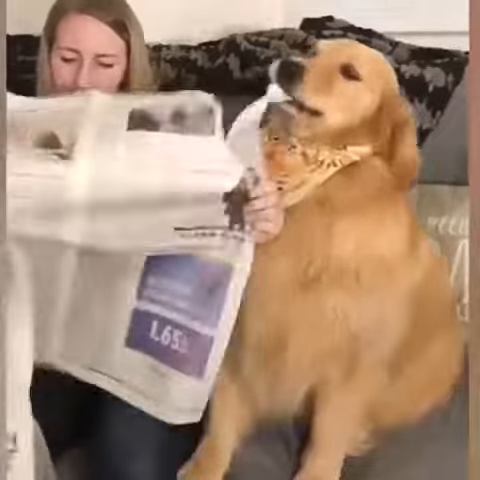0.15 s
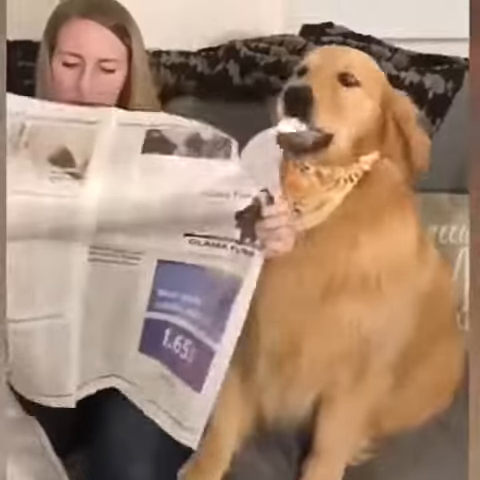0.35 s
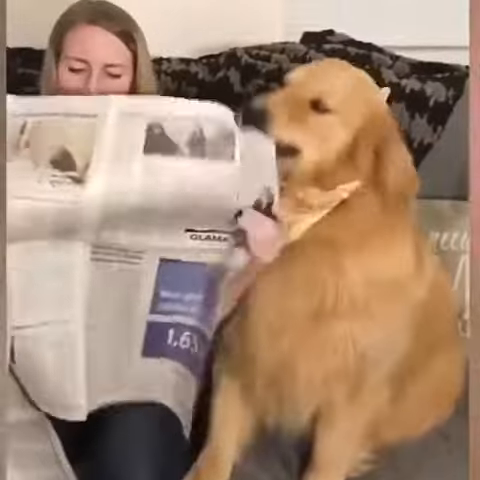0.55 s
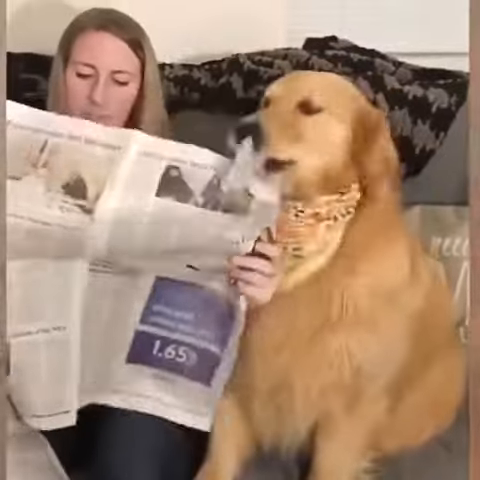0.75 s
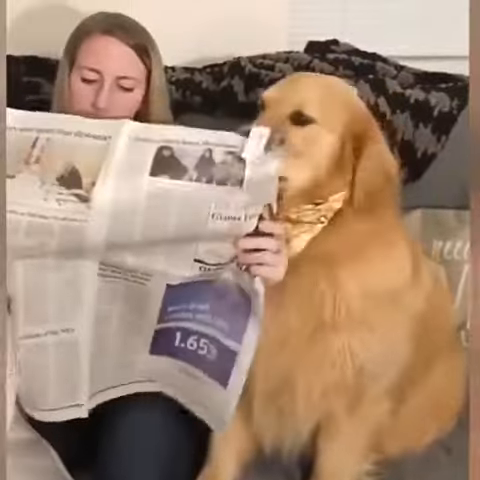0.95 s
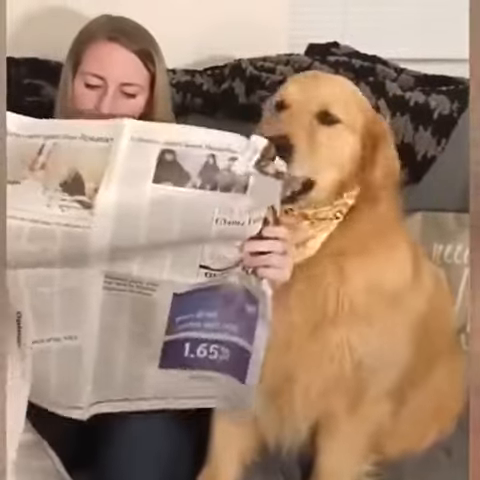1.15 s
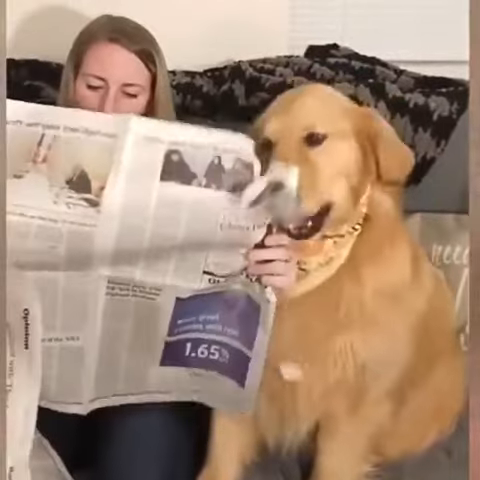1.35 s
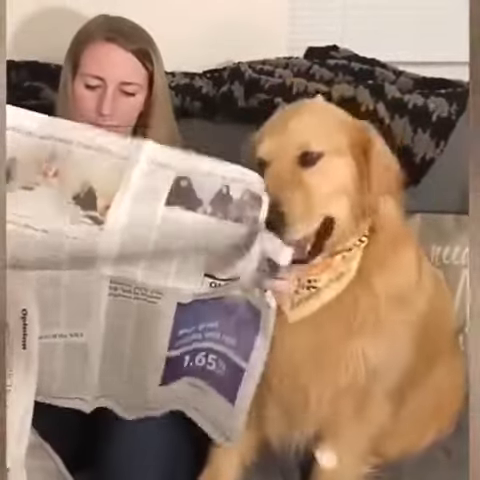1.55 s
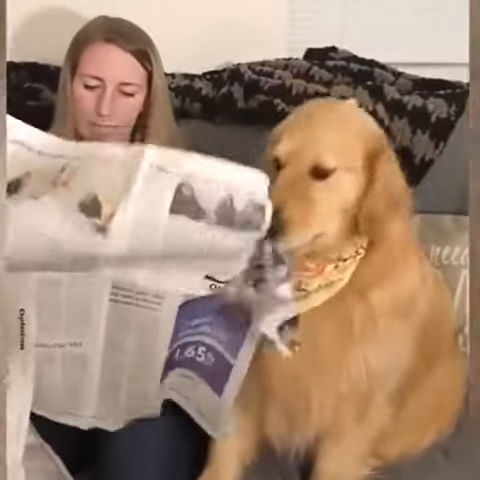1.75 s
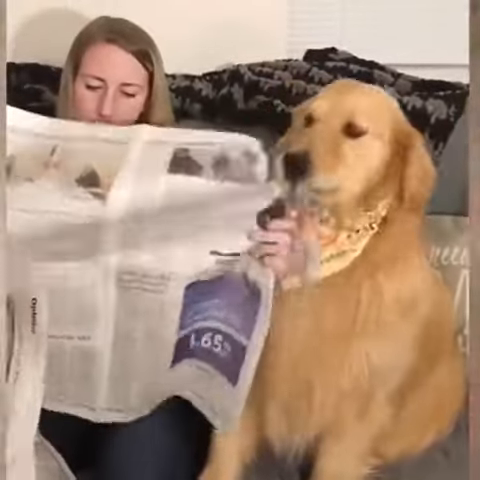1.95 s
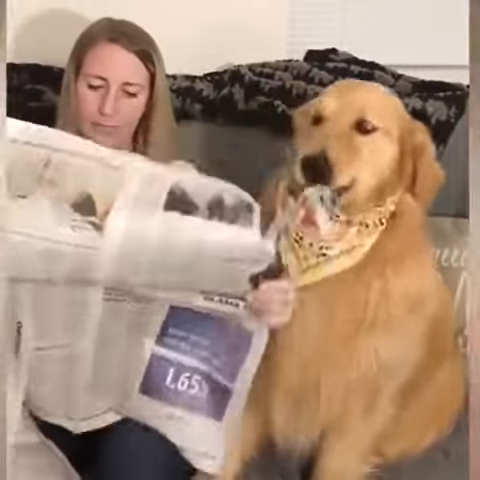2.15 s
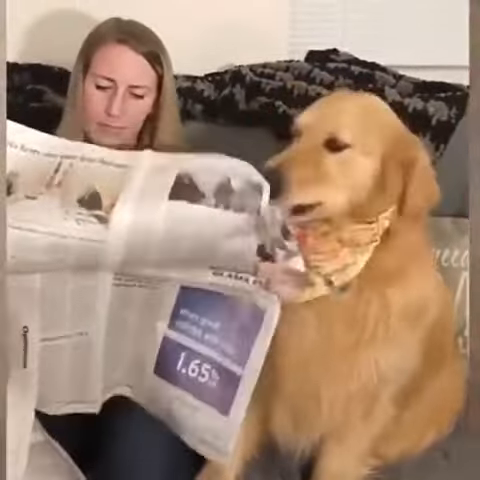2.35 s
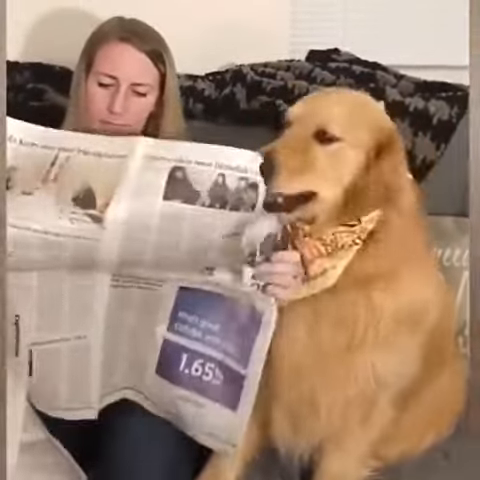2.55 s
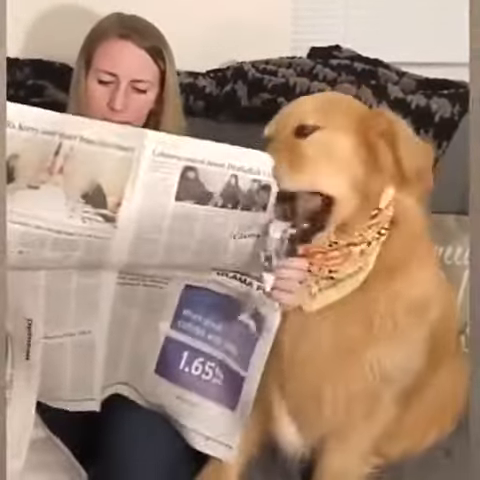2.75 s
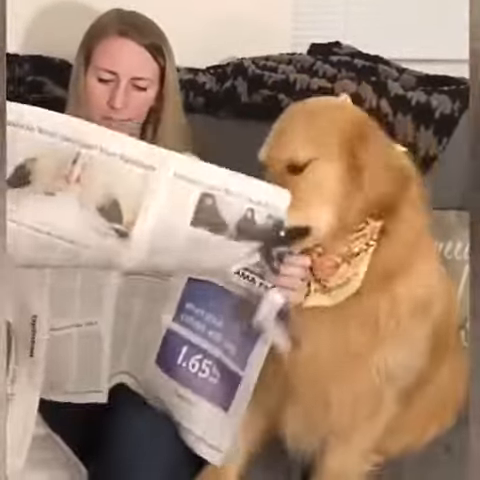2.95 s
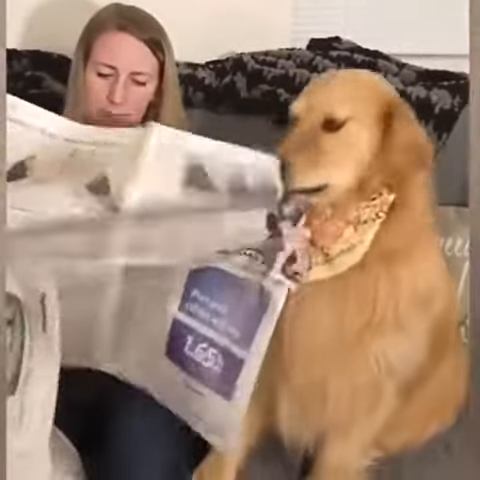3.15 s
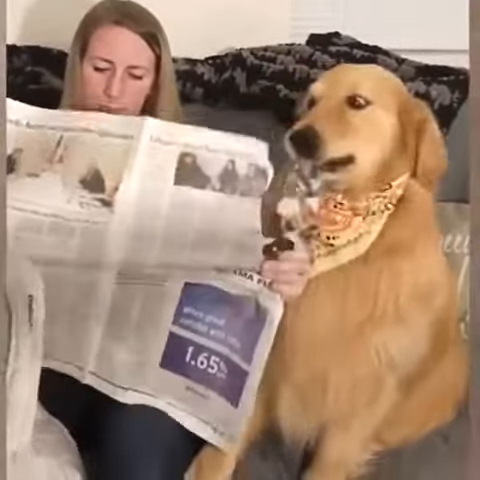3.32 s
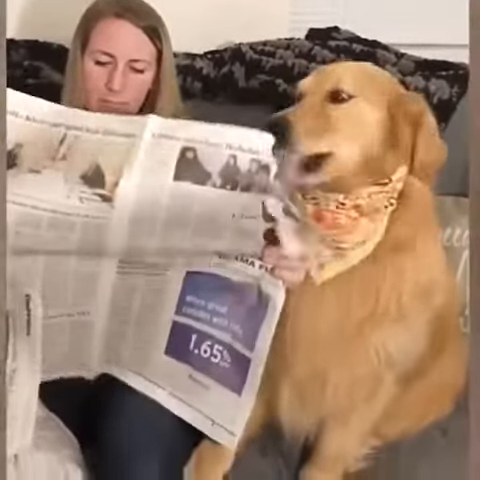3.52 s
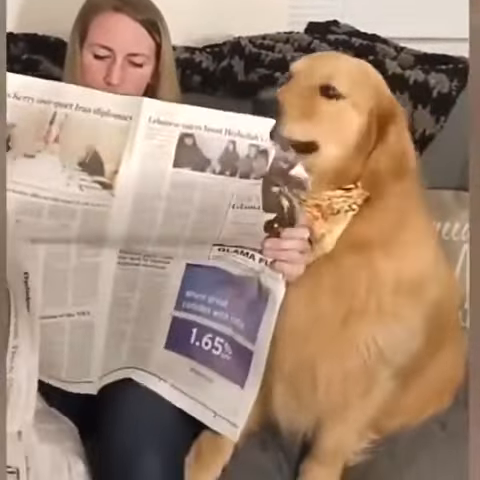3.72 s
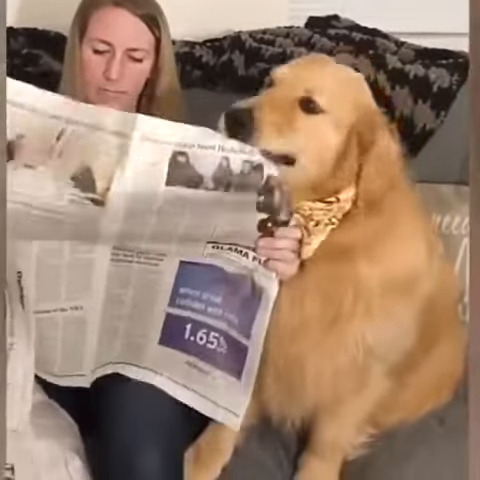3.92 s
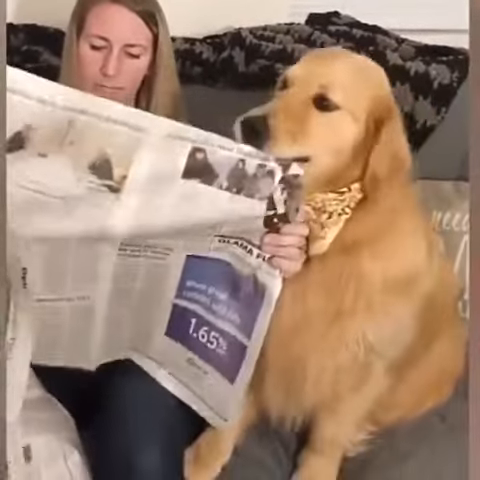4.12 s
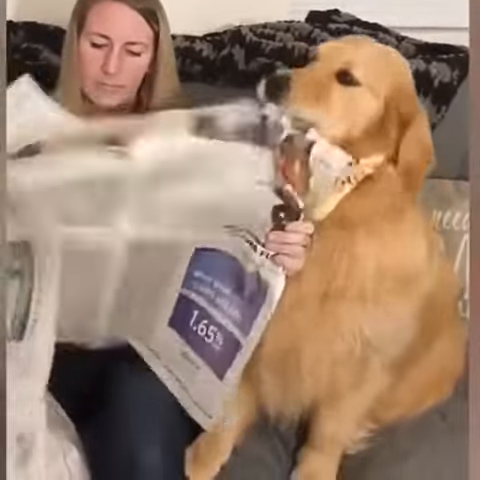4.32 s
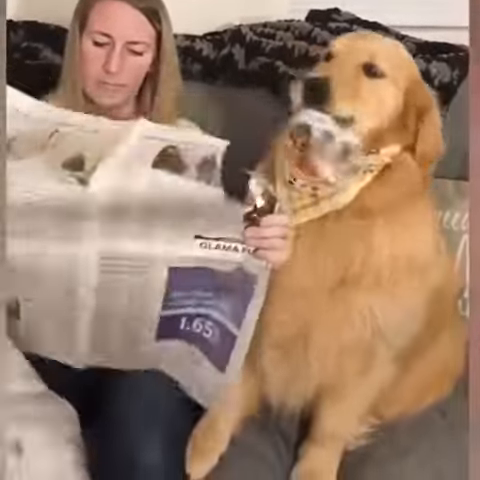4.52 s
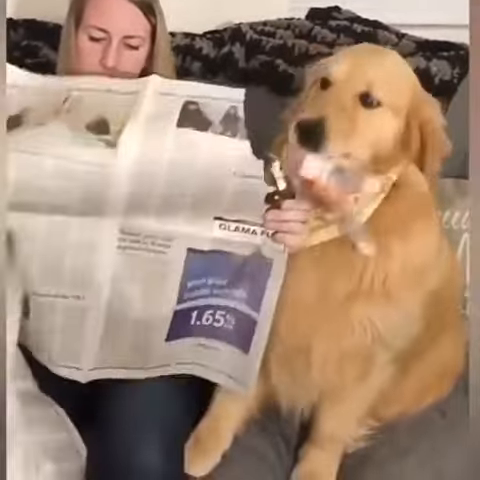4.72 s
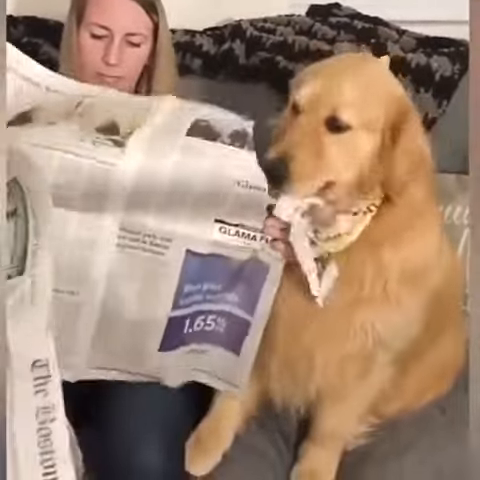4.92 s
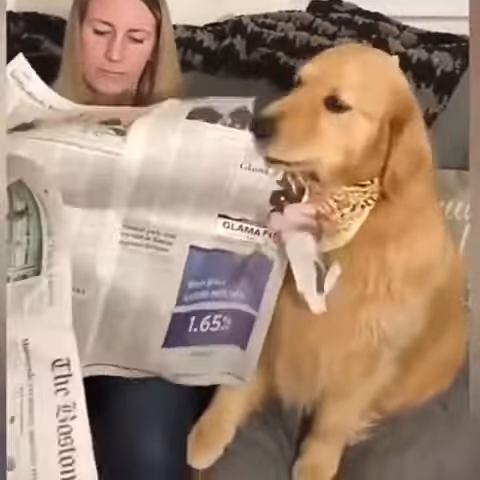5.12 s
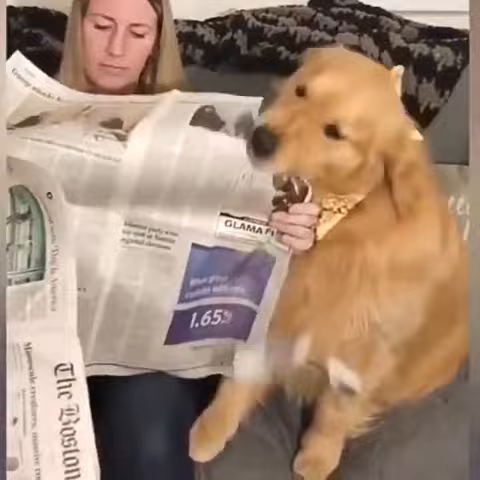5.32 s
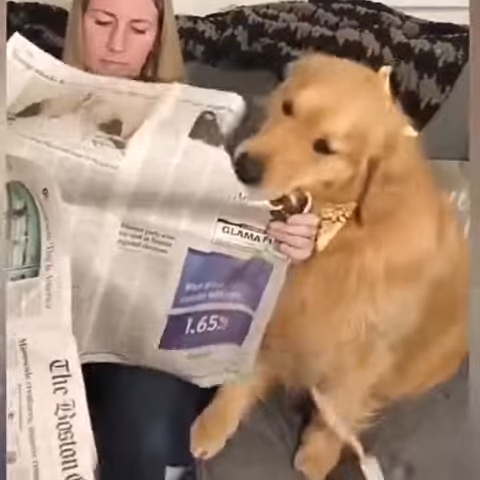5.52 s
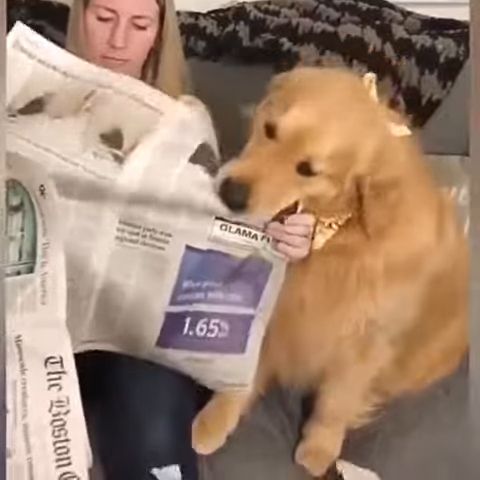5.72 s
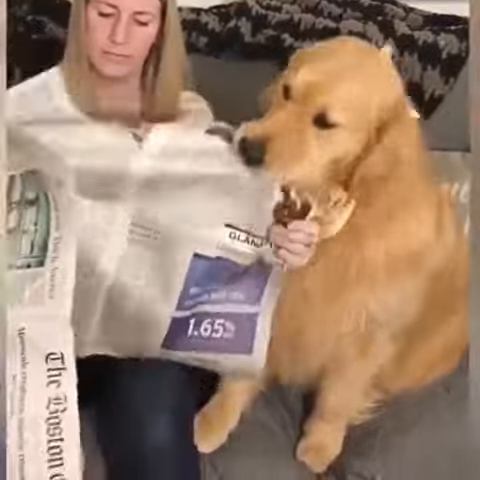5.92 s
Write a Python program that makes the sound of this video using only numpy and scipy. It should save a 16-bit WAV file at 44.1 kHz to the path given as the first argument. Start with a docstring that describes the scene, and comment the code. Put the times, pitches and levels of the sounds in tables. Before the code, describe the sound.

Thin newsprint is bitten, torn and shaken near the microphone. Dense bright rustling comes in uneven surges with dull sheet flaps and sharp creasing clicks, separated by quiet crumpling. The biggest rip arrives late, then light chewing crackles and a tiny hollow pop near the end. The room is dry and soft, with low air noise and a temporary mains hum.

```python
"""Tearing a newspaper page

A dog tugs, tears and chews a held-up newspaper page in a living room, heard from close by.
Each scrunch swells and fades as clumped noise bursts over hiss; the slack sheet flaps as low noise.
Creases snap as short rings and cracks with a thud and crumbling fibres; one hollow pop is a dying sine.
Echoes and noise tails form the room; shaped noise is its air, and a mains hum of sines runs for a while.
The steady treble is spread between the ears by scrambling its phase.
"""
import sys
import numpy as np
from scipy import signal
from scipy.fft import rfft, irfft, next_fast_len
from scipy.io import wavfile
from scipy.ndimage import uniform_filter1d, map_coordinates

SR = 44100
rng = np.random.default_rng(int(sys.argv[2]) if len(sys.argv) > 2 else 0)


def file_out(sig):
    """Save sig as 16-bit WAV at sys.argv[1]."""
    # one column per channel
    cols = np.atleast_2d(sig).T
    # limit, then scale
    lim = np.clip(cols, -1, 1)
    pcm = np.round(lim * 32767).astype(np.int16)
    wavfile.write(sys.argv[1], SR, pcm)


N = 263256
T = np.arange(N) / SR  # time in s

# Scrunches and rips: peak_s, rustle_db, swell_s and fade_s (per 20 dB),
# treble_db and flap_db (both relative to the rustle)
SCRUNCHES = [(0.104, -35.5, 0.23, 0.23, 0.5, -6), (0.207, -31.0, 0.024, 0.27, 3, -20.0),
             (0.241, -29, 0.039, 0.06, -10.0, -7.5), (0.287, -33.0, 0.17, 0.21, 7.5, 0.0),
             (0.318, -26.0, 0.034, 0.084, 2.5, -3), (0.378, -34.5, 0.081, 0.11, 2, -7),
             (0.443, -38.5, 0.33, 0.244, -4, -6), (0.541, -55, 0.035, 0.718, 4.5, -15.5),
             (0.665, -39.5, 0.126, 0.18, -4, -10.0), (0.75, -38, 0.072, 0.091, -4.5, -12.5),
             (0.79, -38, 0.079, 0.24, -1, -5), (0.85, -42.5, 0.035, 0.11, -1, -4),
             (0.924, -37.0, 0.027, 0.19, 5.5, -4.5), (0.956, -35, 0.13, 0.11, -8, -16.5),
             (1.134, -44.0, 0.23, 0.11, -12.5, -4.5), (1.224, -49, 0.051, 0.087, -2, -12.0),
             (1.294, -48.0, 0.021, 0.057, 11.5, -2), (1.41, -51.5, 0.42, 0.17, 1.5, 1),
             (1.596, -46.5, 0.22, 0.27, -8.5, -2), (1.729, -40.5, 0.079, 0.059, -3.5, -3.5),
             (1.819, -39.5, 0.158, 0.14, 0, -6.5), (1.959, -34.5, 0.078, 0.186, 0.5, -2),
             (2.029, -32.5, 0.16, 0.1, 0.5, -6.5), (2.108, -35.5, 0.28, 0.42, 2, -5),
             (2.224, -34.5, 0.19, 0.13, 1.0, -18), (2.542, -54.5, 0.114, 0.121, 7, -20.0),
             (2.61, -46, 0.33, 0.063, -11, -2), (2.782, -49.0, 0.28, 0.059, -10, -2.0),
             (2.95, -56, 0.13, 0.17, -6, 0), (3.035, -37.0, 0.052, 0.14, 3.5, -1),
             (3.144, -36.5, 0.024, 0.2, 2, -0.5), (3.231, -33.5, 0.065, 0.38, 4.5, -7.0),
             (3.334, -31, 0.043, 0.15, 4.5, -7.5), (3.39, -36.5, 0.31, 0.16, 8, -1),
             (3.687, -46.5, 0.2, 0.21, -4, -6.5), (3.756, -47, 0.031, 0.055, 5.5, -7),
             (4.089, -52.0, 0.168, 0.027, 7.5, -2), (4.112, -38.0, 0.087, 0.114, -6, -6.5),
             (4.196, -33.5, 0.032, 0.096, -5, -16), (4.278, -41.5, 0.17, 0.1, -4, -6.5),
             (4.365, -39.5, 0.12, 0.115, -3, -7.5), (4.412, -38.5, 0.07, 0.167, 1, -6.5),
             (4.466, -31.5, 0.042, 0.035, -11, -18), (4.502, -30.5, 0.037, 0.18, 5, -6),
             (4.525, -30.5, 0.05, 0.18, 5.5, -10), (4.546, -24.5, 0.048, 0.076, -4, -2),
             (4.578, -31, 0.15, 0.08, 6, -6), (4.638, -39, 0.11, 0.42, 1.5, -7),
             (4.788, -43.0, 0.7, 0.13, -13, -12.5), (5.001, -49.0, 0.15, 0.028, -2, -4),
             (5.067, -56, 0.14, 0.087, 8, 0), (5.101, -49, 0.058, 0.29, -7, -12),
             (5.214, -55.5, 0.051, 0.641, 1, -2), (5.263, -41.5, 0.023, 0.135, -2, -6.5),
             (5.567, -42.5, 0.098, 0.16, -2.5, -0.5), (5.664, -54.5, 0.074, 0.269, -3, -7),
             (5.784, -47.5, 0.087, 0.107, -31, -1.5), (5.833, -34, 0.033, 0.133, -2, -3.5),
             (5.958, -44.5, 0.019, 0.72, -4, -7.0)]
# Single creases that buckle, and a last click as the sound ends: peak_s, level_db (before the mix weights),
# pitch_hz, crumble_db (relative to the click), treble_db (of the bright crack and crumble, relative to the
# click)
CREASE_SNAPS = [(.0833, -20, 1720, -8.5, -16), (0.099, -18, 6500, -9.5, -5), (.2045, -16, 2700, -20, -10),
                (0.21, -18, 1320, -21, -8), (.5459, -28, 2150, -13, -5), (0.6027, -30.5, 3530, -7.5, -3),
                (.67, -21, 6500, -25, -7), (.7282, -29, 2020, -38, -9), (0.742, -20, 2890, -8, -10),
                (.7892, -17, 2110, -34, -12), (0.8212, -7.5, 4730, -27, -2.5), (.8486, -19, 2710, -34, -14),
                (.919, -15.5, 1810, -7.5, -14), (0.9588, -10.5, 4550, -17, -4),
                (1.2188, -29, 4520, -14, -10), (1.2262, -27, 4540, -34, -13), (1.2922, -16, 5770, -20, -4),
                (1.3207, -27, 6800, -33, -3), (1.3566, -30, 3140, -16, -15), (1.3909, -30.5, 7880, -9, -5),
                (1.515, -31, 1340, -15.5, -6), (1.5693, -28, 2650, -25, -15), (1.5849, -32, 1340, -21, -11),
                (1.6297, -29, 1510, -39, -3), (1.7102, -26, 2630, -8.5, -15), (1.7195, -24, 2540, -34, -10),
                (1.8098, -12.5, 5840, -21, -4), (1.8363, -20, 5530, -29, -12),
                (1.9185, -15.5, 3730, -13.5, -10), (1.9492, -15.5, 2930, -16.5, 1),
                (2.2154, -12, 2580, -33, -3), (2.278, -24, 3830, -34, -10), (2.509, -31, 1340, -15, -4),
                (2.722, -28, 1900, -23, -14), (2.764, -28, 2110, -34, -17),
                (3.0075, -14, 3420, -16.5, -7.5), (3.0198, -21, 5080, -36, -7), (3.036, -17, 5120, -26, -6),
                (3.0421, -14.5, 5680, -34, -4), (3.0755, -23, 9000, -14, -2), (3.1018, -25, 3190, -30, -16),
                (3.1443, -12.5, 3630, -21, 0), (3.231, -10, 4830, -25, -3), (3.6789, -28.5, 4130, -11, -11),
                (3.7575, -19, 3360, -17, -7), (3.967, -35.5, 2370, -26.5, -5),
                (4.1146, -29.5, 1380, -8, -2), (4.1886, -23, 1590, -9, -21), (4.274, -18, 2040, -14, -21),
                (4.3432, -14, 7400, -19, -6.5), (4.3982, -24, 2710, -35, -15),
                (4.4089, -18.5, 4910, -16, -7), (4.4925, -13.5, 3120, -12.5, -6),
                (4.546, -27, 2180, -24, -6), (4.9894, -24.5, 3600, -20, -19), (4.997, -26, 3600, -20, -15),
                (5.0317, -14, 10800, -28, -4.5), (5.062, -17, 3500, -22, -7.5),
                (5.0992, -23, 3340, -20, -22), (5.13, -24, 2000, -25, -25), (5.213, -28, 4910, -22, -12),
                (5.256, -27, 3230, -18, -4), (5.2675, -17.5, 1520, -15.5, -1), (5.2732, -29, 5560, -34, -4),
                (5.33, -27, 3100, -17.5, -20), (5.5102, -33, 2025, -18, -14), (5.5388, -27, 1510, -17, -13),
                (5.5676, -17.5, 2660, -19, -20), (5.6, -26.5, 2500, -16, -5),
                (5.6739, -25.5, 3600, -25, -18), (5.8164, -27, 1335, -10, -13),
                (5.8426, -17.5, 3320, -12, -19), (5.9645, -22.5, 3000, -8.5, -5)]
# Spectral density of crackling paper: frequency_hz, density_db
PAPER_SPECTRUM = [(290, 4), (500, -0.5), (605, -4), (829, -1), (990, -0.5), (1200, -1.5), (1410, -2),
                  (3340, -1.5), (11400, -4), (13100, -8.5)]
# Spectral density of the flapping sheet: frequency_hz, density_db
SHEET_SPECTRUM = [(26, -49), (45, -22.5), (114, -5), (156, -10), (249, 0.5), (287, -3), (344, 2),
                  (384, -4.5), (564, -5), (800, -1), (1040, -17), (1760, -120)]
# Early reflections from near surfaces: delay_s, level_db (relative to the sound sent to the room)
REFLECTIONS = [(.0025, -12.5), (.0053, -55), (.0078, -21.5), (0.0086, -13), (.0145, -41), (0.027, -21)]
# Reverberation time by frequency: frequency_hz, t60_s
ROOM_DECAY = [(150, 0.51), (1000, 0.16), (4000, 0.18), (12000, 0.13)]
# Spectral density of the room air: frequency_hz, density_db
AIR_SPECTRUM = [(14, -30), (30, -20), (55, 0), (80, -3), (100, -4.5), (150, -3), (187, 2), (260, -6),
                (465, -11.5), (1000, -11.5), (2700, -26.5), (4900, -24.5), (13100, -32.5)]
# Partials of the mains hum: frequency_hz, level_db (relative)
HUM_PARTIALS = [(60, -14), (120, 0), (181, -26.5), (240, -18)]
# The hollow pop: start_s, level_db, pitch_hz, t60_s
HOLLOW_POP = (5.7503, -33, 965, .035)

START_S, TOP_HZ = .0815, 13200  # end of the opening silence; band limit
AIR_DB = -51.5
WIDE_HZ = 4000  # upper mids meet the treble here
TREBLE_QUICKER = 1.604  # the treble swells and fades this much faster than the rustle
EDGE_DB, EDGE_SHARE = -3.95, 0.15  # upper mids over the rustle; their share of a scrunch's treble boost
EDGE_SAG = 0.057  # dB of upper mids lost for each dB that a scrunch is louder
SNAP_HZ, BLOW_S = 3000, .0004  # reference pitch for the thud; time from onset to the peak of the blow
THUD_DB, THUD_DB_PER_OCTAVE = -18, -1.5  # at SNAP_HZ, before the mix weight; high creases thud less
SMALL_SNAPS = 150
SMALL_DB, SMALL_SPREAD_DB = 9.5, 2.5  # relative to the upper mids, before the mix weights
SMALL_HZ, SMALL_OCTAVES = 2720, 0.61  # median pitch and its spread
SMALL_CRUMBLE_DB, SMALL_TREBLE_DB = -14, -16
HUM_ON_S, HUM_OFF_S, HUM_SWITCH_S = 2.52, 5.34, .03
HUM_DB, HUM_WAVER_DB = -53, 1.3  # rms of a partial at 0 dB; its random wavering


def amp(db):
    """Decibel law: amplitude ratio of a level."""
    return 10 ** (np.asarray(db) / 20)


def unit(x):
    """Normalization to unit root mean square."""
    return x / np.sqrt(np.mean(x ** 2) + 1e-20)


def along(points, hz):
    """Interpolation of (frequency, value) points on a logarithmic frequency axis."""
    f, v = np.transpose(points)
    return np.interp(np.log(hz + 1), np.log(f + 1), v)


def wobble(rate):
    """Slow random modulation: a smooth curve through `rate` random knots a second."""
    knots = rng.standard_normal(int(N * rate / SR) + 4)
    return map_coordinates(knots, [T * rate])


def filtered(x, response):
    """Linear filtering: the spectrum times a response of frequency."""
    m = next_fast_len(N + SR // 2)
    return irfft(rfft(x, m) * response(np.fft.rfftfreq(m, 1 / SR)), m)[..., :N]


def above(hz, edge_hz):
    """Soft crossover: the share of power passed above the edge."""
    return hz ** 6 / (hz ** 6 + edge_hz ** 6)


def random_field(shape, bins, frames):
    """Local averaging of noise: a random field correlated over frequency and time."""
    return unit(uniform_filter1d(uniform_filter1d(rng.standard_normal(shape), bins, 0), frames, 1))


def patches(x, depth_db, bins, frames):
    """Time-frequency modulation: a random gain field makes the spectrum patchy."""
    z = signal.stft(x, nperseg=256)[2]
    gain = amp(depth_db * random_field(z.shape, bins, frames))
    return unit(signal.istft(z * gain, nperseg=256)[1][:N])


def room_air():
    """Broadband background: steady, slightly lumpy noise given the spectrum of the room air."""
    noise = patches(rng.standard_normal(N), 1.2, bins=4, frames=20)
    return amp(AIR_DB) * unit(filtered(noise, lambda hz: amp(along(AIR_SPECTRUM, hz))))


def pull():
    """Power addition: scrunches sum to levels in dB of rustle, upper mids, treble and flap."""
    power = np.full((4, N // 32 + 2), 1e-9)
    t = np.arange(power.shape[1]) * 32 / SR
    for s, db, swell_s, fade_s, treble_db, flap_db in SCRUNCHES:
        shape_db = -20 * np.maximum((s - t) / max(swell_s, .005), (t - s) / max(fade_s, .005))
        edge_db = EDGE_DB - EDGE_SAG * (db + 42) + EDGE_SHARE * treble_db
        edge_db = edge_db + (1 + TREBLE_QUICKER) / 2 * shape_db
        crisp_db = treble_db + TREBLE_QUICKER * shape_db
        power += amp(db + np.array([shape_db, edge_db, crisp_db, flap_db + shape_db])) ** 2
    return [np.interp(T, t, 10 * np.log10(p)) for p in power]


def crinkles(count, spread_db, top_db, clump_db, hiss):
    """Crackling noise: clumped tiny bursts of uneven but limited size over sliding hiss."""
    draw = rng.random((count, 2))
    sizes = amp(np.minimum(-spread_db * np.log(1 - draw[:, 1]), top_db))
    ticks = np.bincount((draw[:, 0] * N).astype(int), sizes, N)
    fade = amp(-60 * np.arange(400) / SR / 0.0042)
    bursts = np.convolve(ticks, fade)[:N] * rng.standard_normal(N)
    # strong hiss evens out the clumps
    clumps = amp(clump_db * (wobble(35) + wobble(110)) / np.sqrt(np.maximum(hiss, 1)))
    mixture = (unit(bursts) + hiss * rng.standard_normal(N)) / np.sqrt(1 + hiss ** 2)
    return unit(clumps * mixture)


def rustle(level_db, edge_db, crisp_db, flap_db):
    """Band mixing: body, edge, crisp treble and low flap of the paper, each at its own level."""
    hiss = amp(0.37 * np.clip(level_db + 54, -7, 20))  # a loud rustle blurs the crackle into a dense tear
    crackle = crinkles(count=4000, spread_db=5.0, top_db=7.5, clump_db=1.05, hiss=hiss)
    grain = patches(crackle, 1.47, bins=9, frames=3)

    def band(x, spectrum, low_hz, high_hz):
        """Band selection: the shaped spectrum between two soft crossovers."""
        def response(hz):
            """Power difference of two crossovers, weighted by the spectrum."""
            return amp(along(spectrum, hz)) * np.sqrt(above(hz, low_hz) - above(hz, high_hz))
        return unit(filtered(x, response))

    body = band(grain, PAPER_SPECTRUM, 640, 1900)
    edge = band(grain, PAPER_SPECTRUM, 1900, WIDE_HZ)
    crisp = band(grain, PAPER_SPECTRUM, WIDE_HZ, SR)
    lumps = amp(2.0 * wobble(22.04)) * rng.standard_normal(N)
    flap = band(lumps, SHEET_SPECTRUM, 85, 510)
    return amp(level_db) * body + amp(edge_db) * edge + amp(crisp_db) * crisp + amp(flap_db) * flap


def small_snaps(edge_db):
    """Random arrivals: lesser creases give way at chance moments, louder where the upper mids are."""
    s = rng.random(SMALL_SNAPS) * (N - 1) / SR
    size, pitch = rng.standard_normal((2, SMALL_SNAPS))
    db = np.interp(s, T, edge_db) + SMALL_DB + SMALL_SPREAD_DB * size
    hz = SMALL_HZ * 2 ** (SMALL_OCTAVES * pitch)
    return [(max(a, .001), b, c, SMALL_CRUMBLE_DB, SMALL_TREBLE_DB) for a, b, c in zip(s, db, hz)]


def snaps(rows):
    """Buckling: a crease clicks for a few cycles, the sheet thuds dully and fibres crumble."""
    dull, bright, t = np.zeros(N + SR), np.zeros(N + SR), np.arange(SR // 8) / SR
    for s, db, hz, crumble_db, treble_db in rows:
        thud_db = THUD_DB + THUD_DB_PER_OCTAVE * np.log2(hz / SNAP_HZ)
        noise = rng.standard_normal((3, len(t)))
        blow = (t / BLOW_S) ** 2 * np.exp(2 - 2 * t / BLOW_S)
        ring = np.sin(2 * np.pi * hz * t) * np.sqrt(blow) * np.exp(-t * hz / 9)
        crack = blow * noise[0] / abs(blow * noise[0]).max()
        fibres = amp(1.6 * unit(uniform_filter1d(noise[2], 40)))  # uneven, in bits of a millisecond
        crumble = amp(crumble_db) * fibres * noise[1] * np.exp(-(t / 0.0072) ** 2)
        thud_hz = 800 * rng.uniform(0.66, 1.4)
        thud = amp(thud_db) * np.sin(2 * np.pi * thud_hz * t) * amp(-60 * t / 0.018)
        at = round((s - BLOW_S) * SR)  # the blow peaks at s
        dull[at:][:len(t)] += amp(db) * (0.46 * ring + 0.61 * crack + 1.13 * crumble + 0.18 * thud)
        bright[at:][:len(t)] += amp(db) * (0.34 * ring + amp(treble_db) * (1.1 * crack + 0.98 * crumble))
    low = filtered(dull[:N], lambda hz: above(hz, 200) * (1 - above(hz, 8500)))
    return low + filtered(bright[:N], lambda hz: above(hz, 5500))


def room(x, wet_db):
    """Reverberation: a few near reflections, then a tail dying by band, redrawn each quarter second."""
    out, step = np.zeros(N + 2 * SR), SR // 4
    for s, db in REFLECTIONS:
        out[round(s * SR):][:N] += amp(db) * x
    for i in range(0, N, step):
        hz, t, z = signal.stft(rng.standard_normal(SR // 2), SR, nperseg=256)
        decay = amp(-60 * t / along(ROOM_DECAY, hz)[:, None])
        tail = signal.istft(z * decay, SR, nperseg=256)[1]
        answer = signal.fftconvolve(x[i:i + step], tail / np.linalg.norm(tail))
        out[i + 300:][:len(answer)] += amp(wet_db) * answer
    return out[:N]


def spread(x, cracks):
    """Decorrelation: scrambled phase widens the treble in flickering patches that shut at a snap."""
    hz, _, z = signal.stft(x, SR, nperseg=1024)
    crack_power = abs(signal.stft(cracks, SR, nperseg=1024)[2][100:]) ** 2  # bins of the treble
    calm = crack_power.sum(0) < .6 * (abs(z[100:]) ** 2).sum(0)
    field = random_field(z.shape, bins=50, frames=5)
    opened = (field > -.55) & (hz[:, None] > 1.04 * WIDE_HZ) & calm
    scrambled = abs(z) * np.exp(2j * np.pi * rng.random(z.shape))
    return signal.istft(opened * scrambled, SR, nperseg=1024)[1][:N]


def mains_hum():
    """Additive synthesis: wavering sine partials of the mains switch on and later off."""
    hum = np.zeros(N)
    for hz, db in HUM_PARTIALS:
        phase = 2 * np.pi * hz * T + 0.17 * wobble(4.95)
        hum += amp(db + HUM_WAVER_DB * wobble(5.42)) * np.sin(phase)
    on = np.clip(np.minimum(T - HUM_ON_S, HUM_OFF_S - T) / HUM_SWITCH_S, 0, 1)
    return np.sqrt(2) * amp(HUM_DB) * on * hum


def pop():
    """Cavity resonance: a small hollow, perhaps the dog's mouth, rings as a decaying sine."""
    s, db, hz, t60 = HOLLOW_POP
    t = np.maximum(T - s, 0)
    return amp(db - 60 * t / t60) * np.sin(2 * np.pi * hz * t)


def scene():
    """Superposition: paper, room and air in the middle; only the steady treble is wide."""
    levels = pull()
    paper = rustle(*levels)
    cracks = snaps(small_snaps(levels[1]) + CREASE_SNAPS) + pop()
    steady = paper + room(0.19 * paper, wet_db=0.5) + room_air() + mains_hum()
    cracks = cracks + room(cracks, wet_db=-21)
    side = amp(.4) * spread(steady, cracks)
    return steady + cracks + np.array([side, -side])  # opposite signs at the two ears


def record(dry):
    """Band limiting: sound starts after a short silence and keeps nothing above the limit."""
    opening = np.clip((T - START_S) * 1000, 0, 1)  # rises over 1 ms
    return filtered(dry * opening, lambda hz: hz < TOP_HZ)


dry = scene()
out = record(dry)
file_out(out)
```